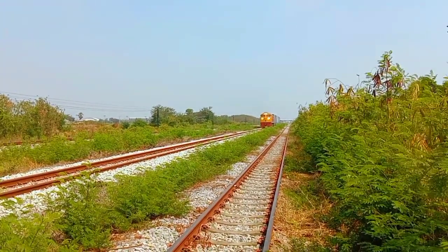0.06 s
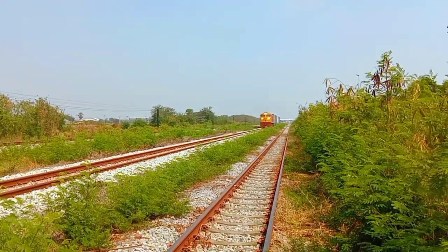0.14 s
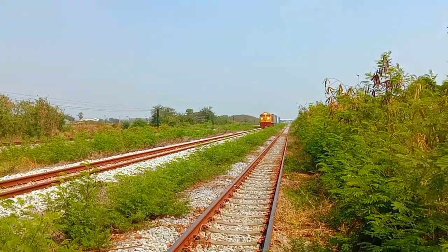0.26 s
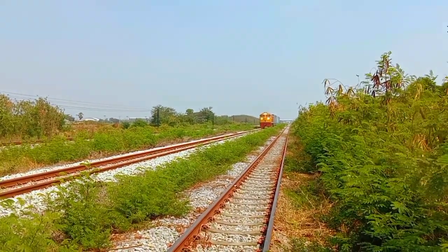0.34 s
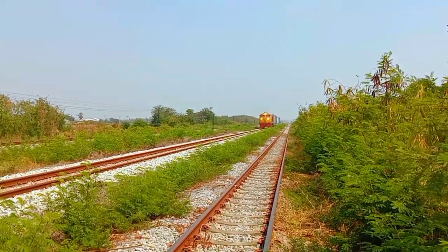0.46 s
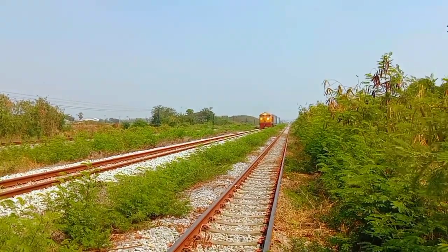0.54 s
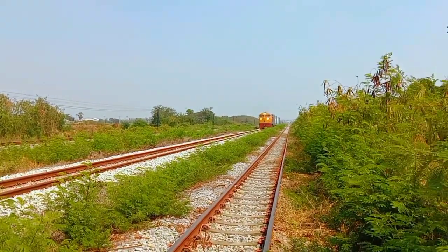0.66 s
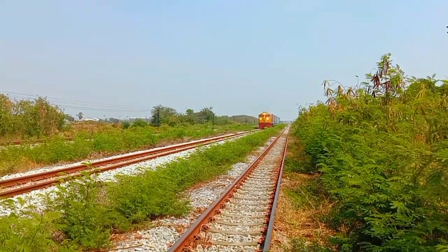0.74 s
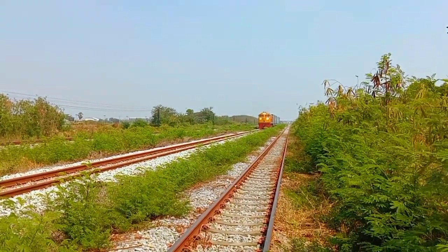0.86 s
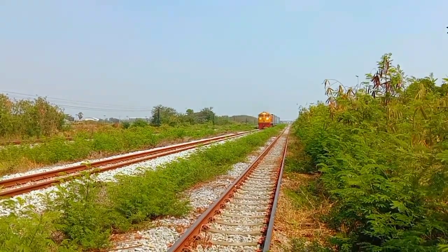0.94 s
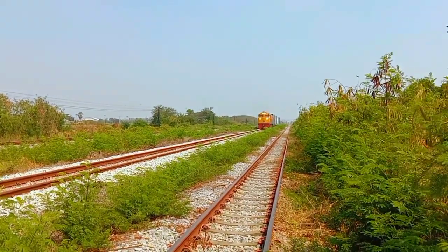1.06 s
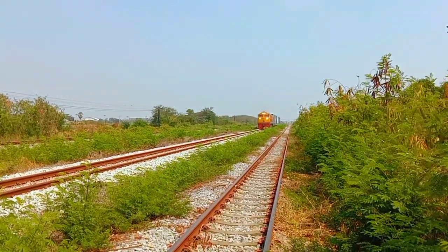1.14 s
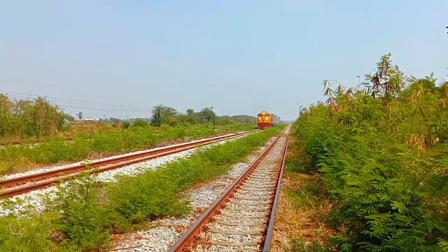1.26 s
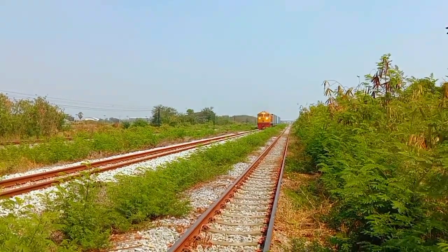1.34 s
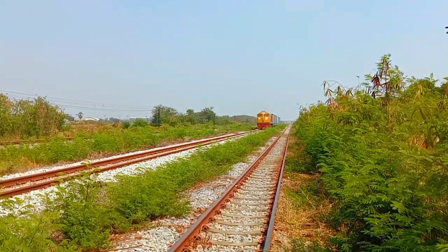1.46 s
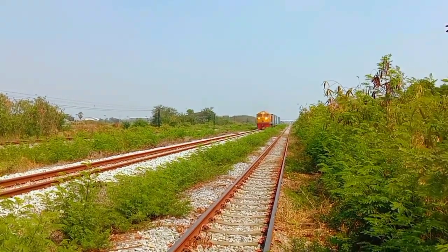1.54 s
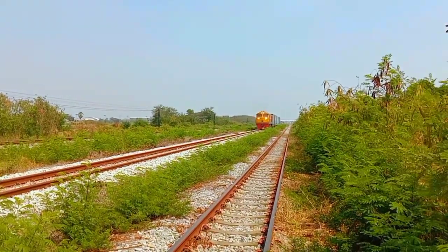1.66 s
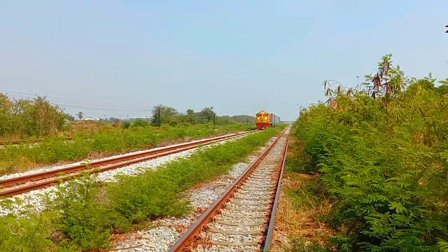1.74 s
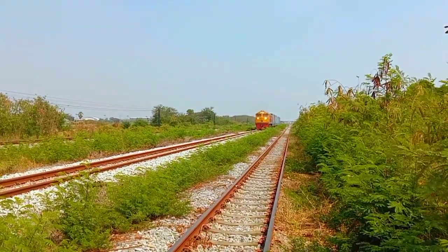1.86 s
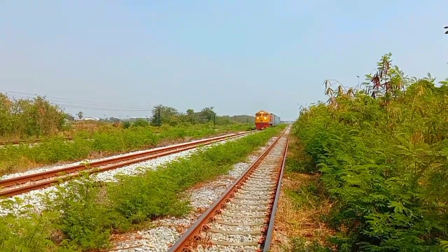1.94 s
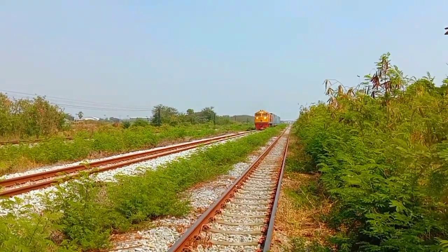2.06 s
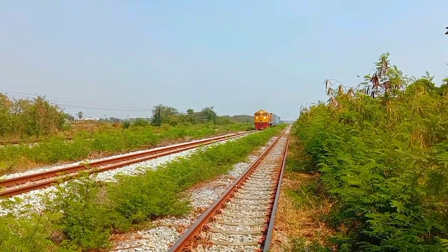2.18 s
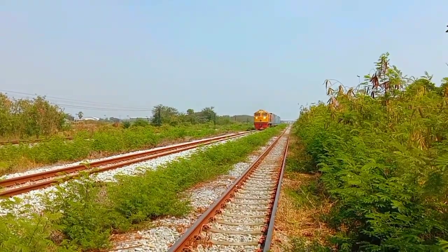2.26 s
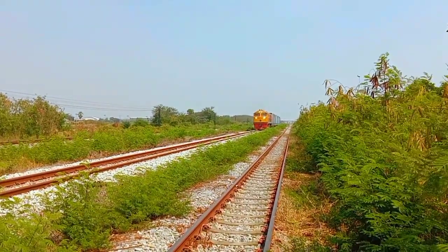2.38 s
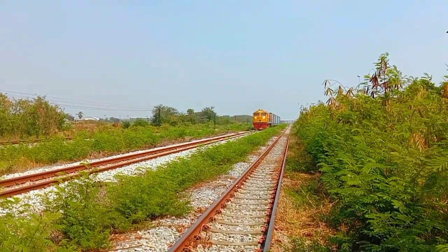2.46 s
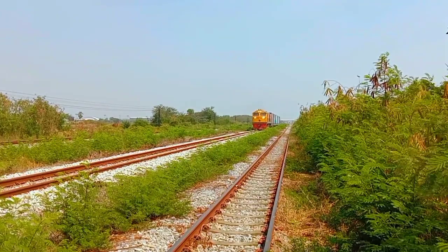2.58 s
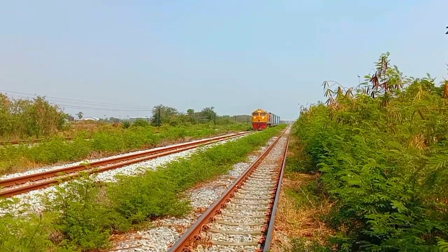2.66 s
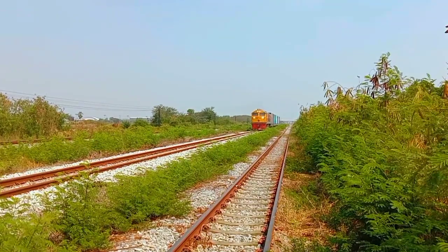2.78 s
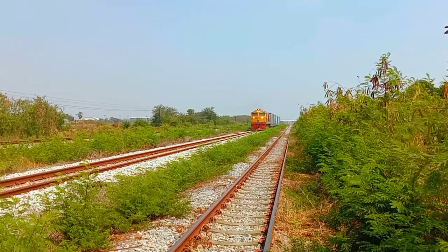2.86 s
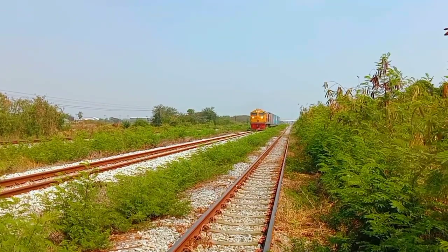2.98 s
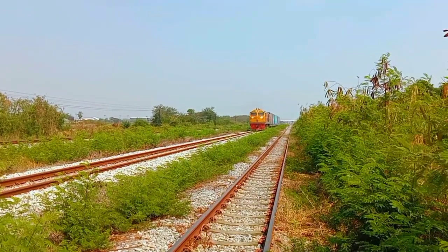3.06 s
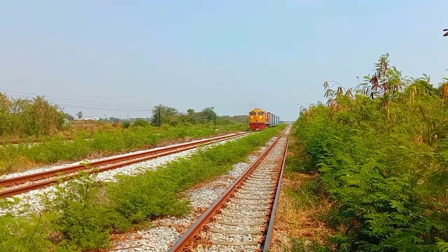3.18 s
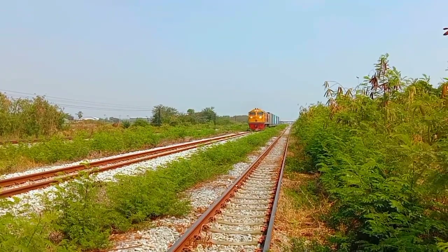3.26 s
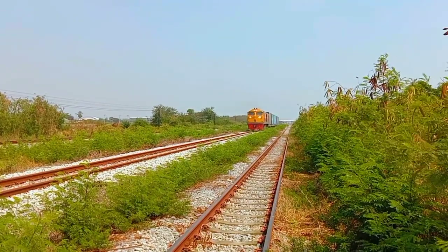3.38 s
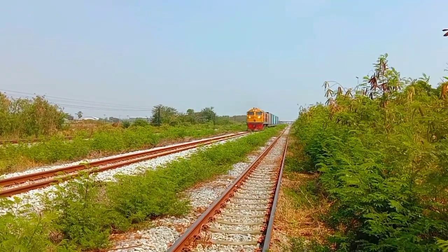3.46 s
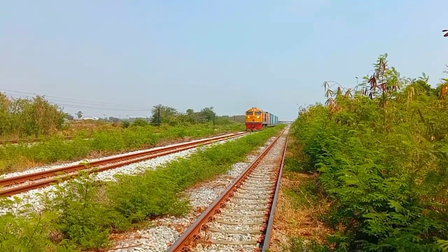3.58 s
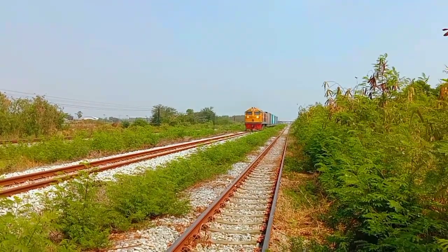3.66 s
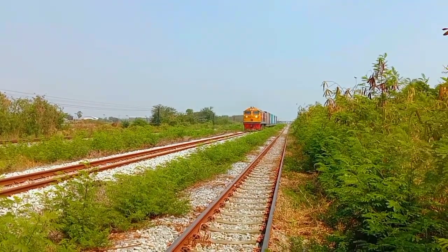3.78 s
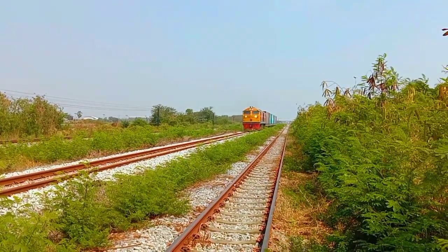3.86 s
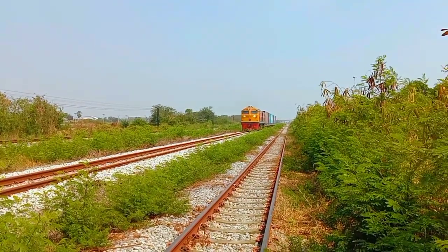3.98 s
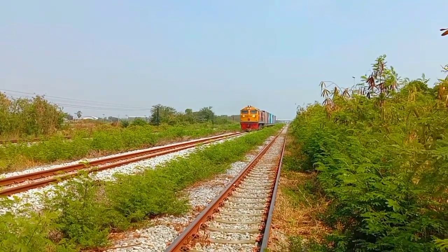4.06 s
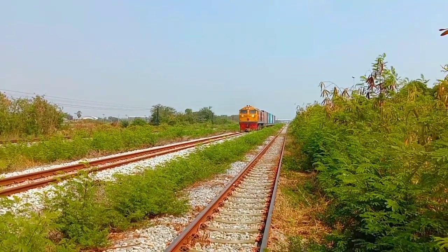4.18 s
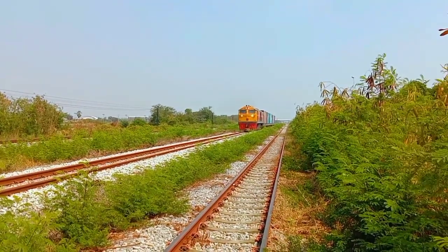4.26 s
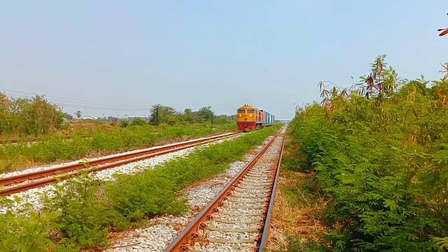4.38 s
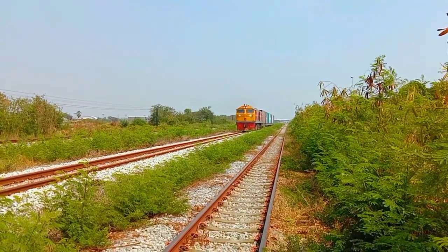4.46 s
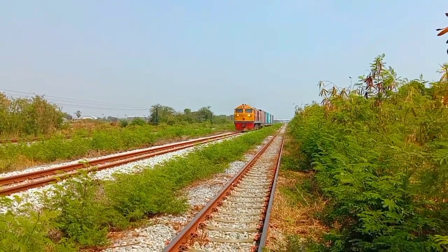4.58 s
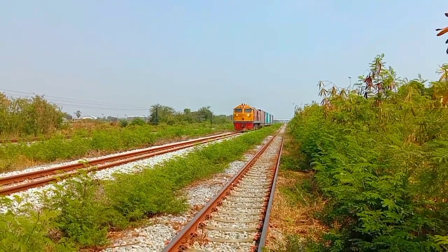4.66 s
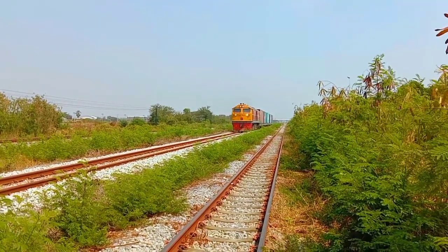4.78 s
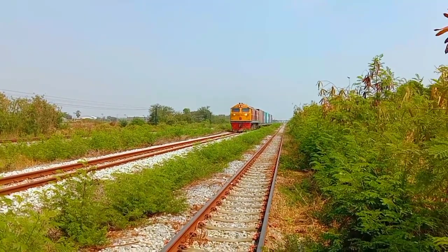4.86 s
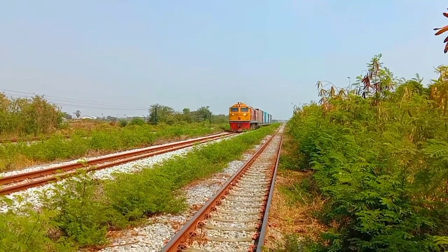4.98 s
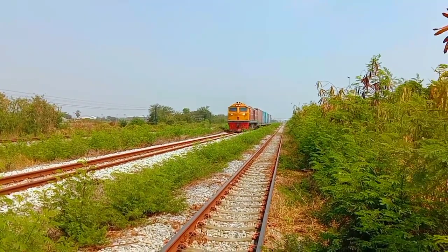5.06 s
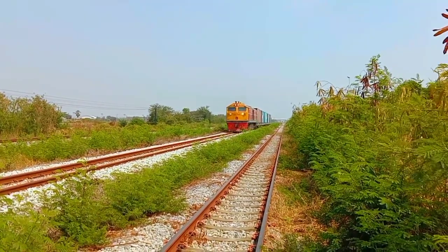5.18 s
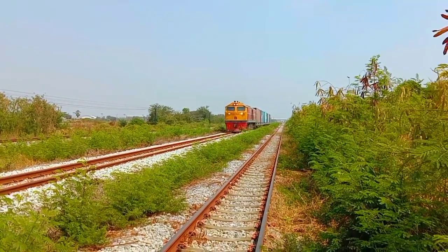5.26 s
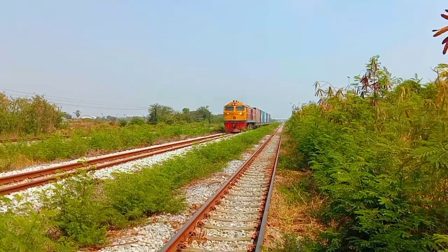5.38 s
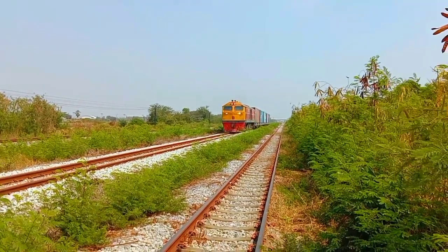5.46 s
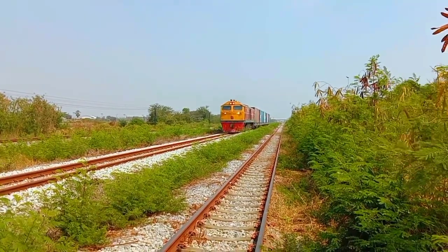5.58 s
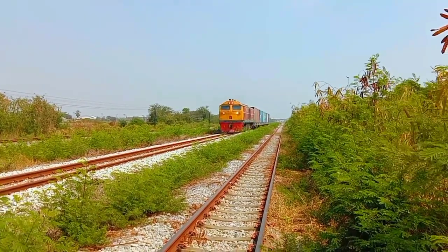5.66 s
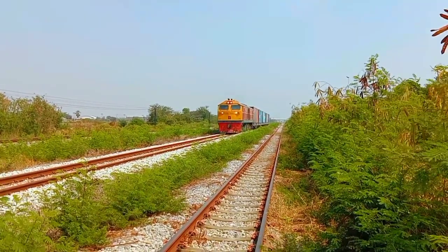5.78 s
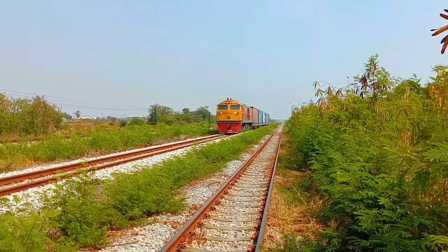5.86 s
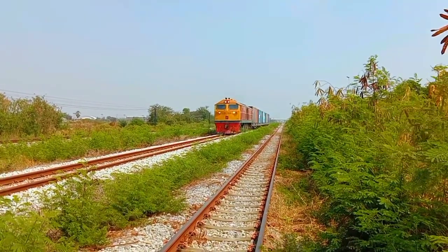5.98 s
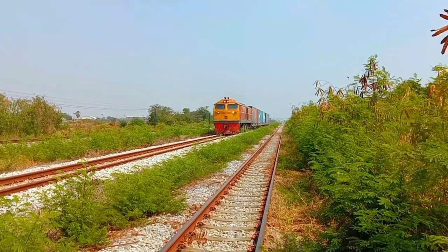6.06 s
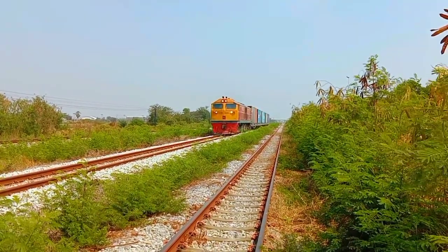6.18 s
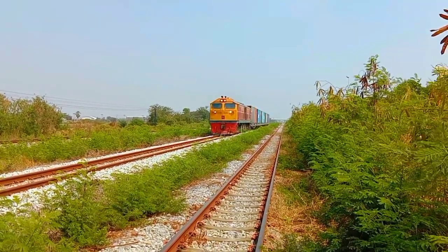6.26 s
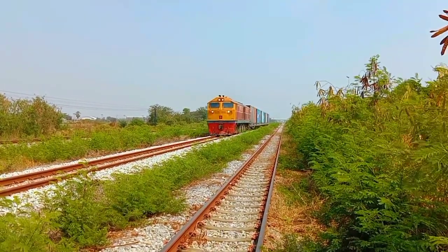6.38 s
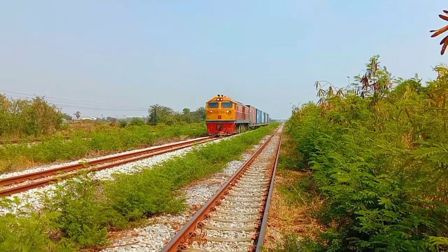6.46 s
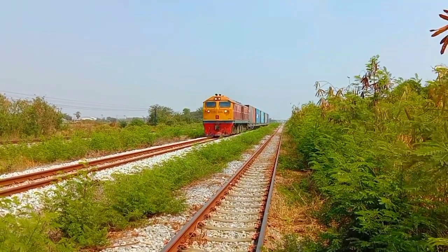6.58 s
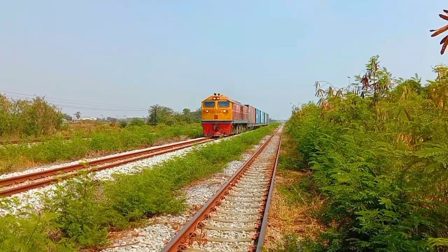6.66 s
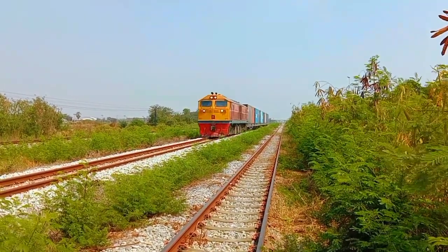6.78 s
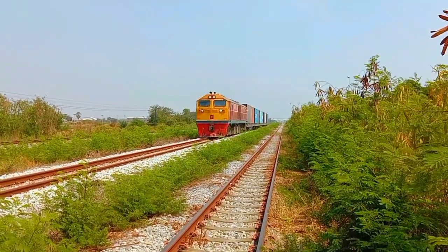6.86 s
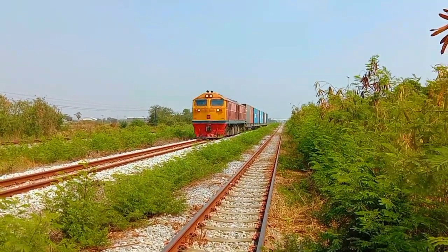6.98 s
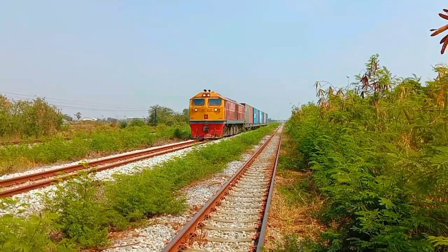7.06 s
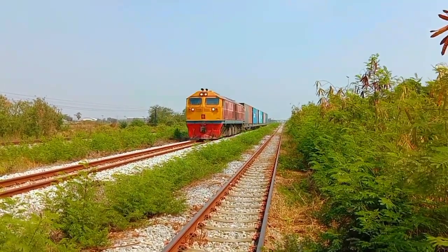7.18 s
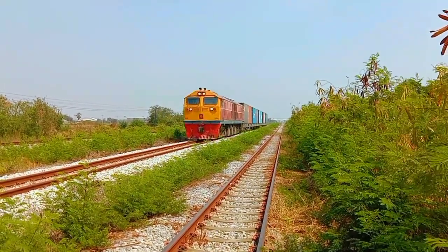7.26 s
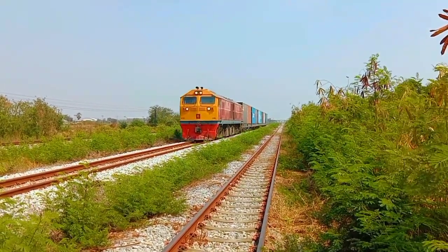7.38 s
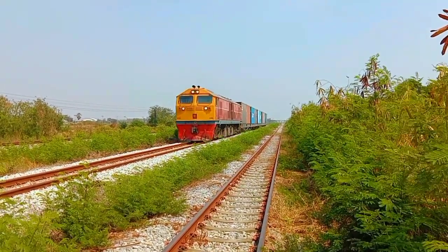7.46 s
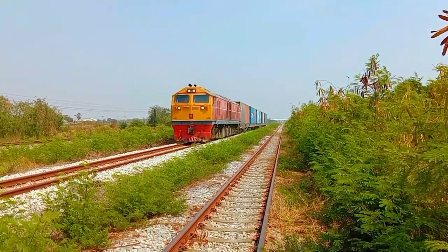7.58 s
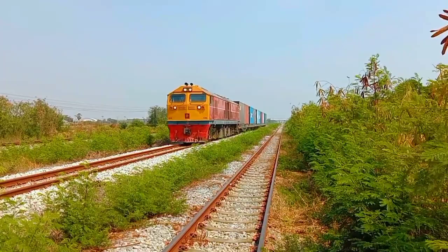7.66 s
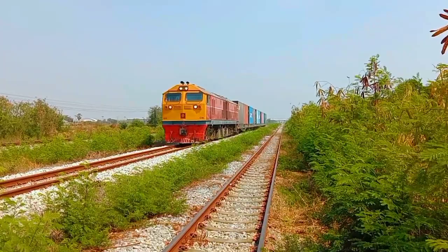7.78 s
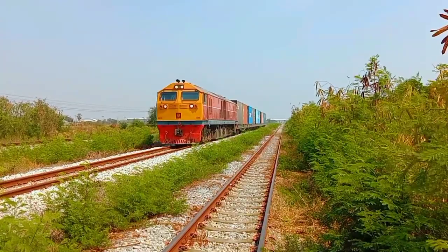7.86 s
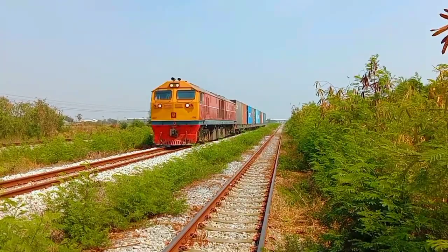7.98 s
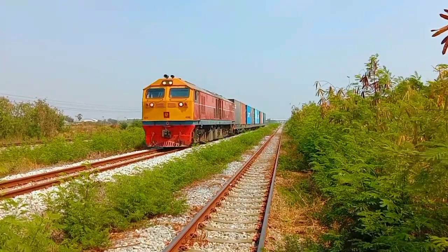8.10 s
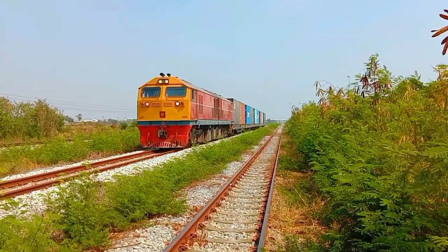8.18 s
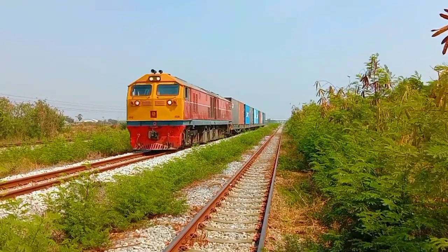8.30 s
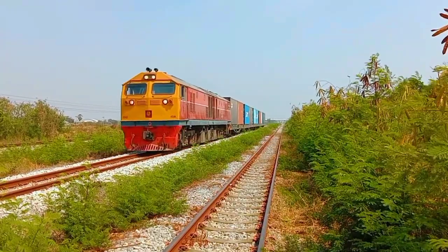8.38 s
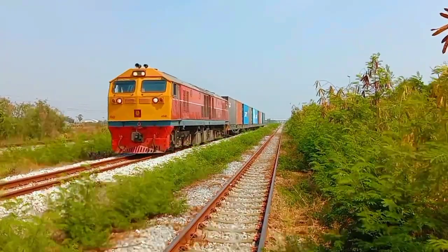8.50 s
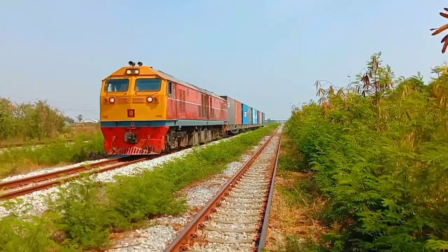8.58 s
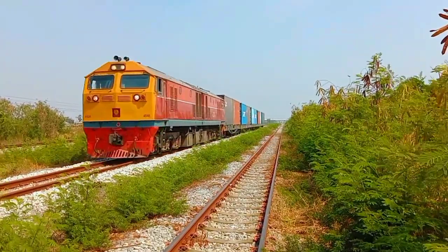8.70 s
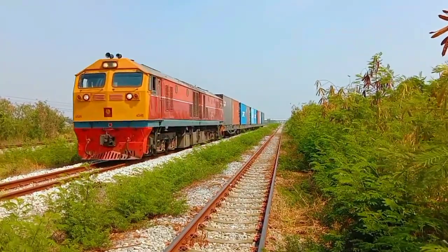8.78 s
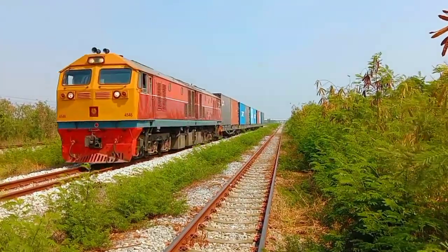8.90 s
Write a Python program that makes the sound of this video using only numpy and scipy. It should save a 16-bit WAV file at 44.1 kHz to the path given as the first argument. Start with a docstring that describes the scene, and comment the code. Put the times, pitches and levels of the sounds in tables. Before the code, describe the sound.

A diesel locomotive's throbbing low hum and broadband roar swell steadily as a freight train approaches outdoors, its engine pitch easing down near the end.

```python
"""A diesel locomotive hums and roars louder as it draws near with freight wagons, then eases its throttle.
The hum is sines on orders of the uneven engine cycle; two gear tones sing beside it on pitches of their own.
Wheels, exhaust and fans are noise in fixed bands that throb with the engine and waver with the moving air.
Over this lie jolt bursts, tone glints and a few dry ticks close by; thin whistles, ragged bursts of hiss
in the highest treble and low wind puffs form the background."""
import sys
import numpy as np
from scipy import signal
from scipy.io import wavfile
from scipy.ndimage import uniform_filter1d

SR = 44100
rng = np.random.default_rng(int(sys.argv[2]) if len(sys.argv) > 2 else 0)


def store_wav(level_fs):
    """Save 16-bit WAV to argv[1]."""
    pcm = np.round(np.clip(np.atleast_2d(level_fs), -1, 1) * 32767)
    wavfile.write(sys.argv[1], SR, pcm.T.astype(np.int16))


N = 393813

# engine speed: (t/s, cycle f/Hz)
CYCLE_HZ = [(0.0, 9.35), (3.5, 9.353), (5.0, 9.371), (5.6, 9.365), (5.75, 9.388), (6.0, 9.48),
            (6.25, 9.485), (6.5, 9.39), (6.75, 9.205), (7.0, 9.1), (7.5, 8.86), (8.25, 8.456), (8.5, 8.362),
            (8.93, 8.24)]
# order spectrum before gain curves and waver: (order of cycle, level/dB)
ORDER_DB = [(5, -57.2), (6, -64.7), (7, -44.3), (8, -41.2), (9, -27.8), (10, -53.5), (11, -27.8),
            (12, -49.8), (13, -33.9), (14, -58.7), (15, -55.3), (16, -49.2), (17, -62.6), (18, -55.3),
            (19, -51.4), (20, -40.2), (21, -43.7), (22, -42.2), (23, -44.4), (24, -37.1), (25, -50.7),
            (26, -50.2), (27, -44.7), (28, -43.4), (29, -41.5), (30, -45.9), (31, -40.2), (32, -34.4),
            (33, -44.4), (34, -42.0), (35, -50.9), (36, -37.0), (37, -42.5), (38, -46.8), (39, -46.7),
            (40, -53.4), (41, -47.6), (42, -53.8), (43, -53.6), (44, -48.1), (45, -37.8), (46, -48.2),
            (47, -45.7), (48, -46.9), (49, -54.4), (50, -48.8), (51, -47.8), (52, -45.8), (53, -55.0),
            (54, -45.0), (55, -55.6), (56, -52.3)]
# uneven exhaust pulses: (place in cycle 0-1, size 0-1)
FIRINGS = [(.06, .25), (.215, .4), (.335, .85), (.425, 1), (.53, .35), (.68, .7), (.79, .4), (.885, .6),
           (.985, .5)]
# leading low orders: (t/s, order 9 level/dB, order 11 level/dB)
HUM_DB = [(0, -52, -45.5), (.5, -52, -62), (1, -56, -62), (1.5, -50, -62), (2, -38.5, -48),
          (2.5, -35.5, -32.5), (3.5, -29.5, -26), (4, -26.5, -28.5), (5, -23.5, -25), (5.5, -23.5, -28),
          (6.25, -23, -34), (6.55, -24.5, -37), (7, -23, -25), (7.3, -25.5, -32.5), (7.5, -28.5, -35),
          (7.8, -27.5, -36), (8.3, -27, -24.5), (8.93, -42, -31.5)]
# gain of orders from 19 up that do not bloom: (t/s, gain/dB)
UPPER_DB = [(0, -15), (1, -16), (1.5, -5), (2.5, -6), (3.5, -5), (5.6, 0.5), (6.5, -5.5), (7.3, -7),
            (8, -0.5), (8.5, 0.5), (8.93, 10.5)]
ORDER13_UNDER_11_DB = 6.5
ORDER7_PER_ORDER9 = .72  # dB per dB
LAG_PER_ORDER9 = .5  # dB per dB; orders 19-23 sink while order 9 is under its table level


def engine(turns, waver_db=2.5):
    """Exhaust pulses repeat each cycle, so the hum is sines at multiples of the cycle rate."""
    base_db = dict(ORDER_DB)
    ninth, eleventh = curves(HUM_DB)
    upper_db, = curves(UPPER_DB)
    lead = {9: ninth, 11: eleventh, 13: eleventh - ORDER13_UNDER_11_DB}
    lead[7] = base_db[7] + ORDER7_PER_ORDER9 * (ninth - ninth.max())
    for order in (20, 24, 27, 29, 32, 45, 54):
        lead[order] = blooms(str(order))
    lag_db = LAG_PER_ORDER9 * np.minimum(ninth - base_db[9], 0)
    place, size = np.transpose(FIRINGS)
    out = np.zeros(N)
    for order, db in ORDER_DB:
        if order < 19:
            # the pipe delays low orders unevenly: each throb swells slowly and stops short
            start = .2 * order - .025 * (order - 9) ** 2
            follow_db = lead[7] - base_db[7]
        else:
            # high orders line up so that each pulse is a sharp dip in pressure
            pulses = size @ np.exp(-2j * np.pi * order * place)
            start = np.angle(pulses) / (2 * np.pi) - .25
            follow_db = upper_db + lag_db * (order < 24)
        if order in lead:
            level_db = lead[order]
        else:
            level_db = db + follow_db + waver_db * walk(1.48)  # moving air
        out += undb(level_db) * np.sin(2 * np.pi * (order * turns + start))
    return np.sqrt(2) * out


# floor between blooms: {tone: level/dB}
RESTING_DB = {"20": -57, "24": -54, "27": -52.5, "29": -54, "32": -47, "45": -50, "54": -57, "low gear":
              -50.5}
# (tone: engine order or gear, t/s, half length/s, peak level/dB over the floor's gain)
BLOOMS = [("20", 3.9, .8, -42), ("20", 5.57, .7, -36), ("20", 7.6, .8, -43), ("27", 2.1, .5, -41),
          ("27", 6.1, 0.49, -33), ("27", 7.4, .5, -33.5), ("27", 8.4, 0.43, -32), ("24", 1.58, 0.32, -36.5),
          ("24", 3.68, 0.34, -37.5), ("24", 4.28, 0.47, -36.5), ("24", 6.0, 0.23, -33.5),
          ("24", 6.87, 0.25, -31.5), ("24", 7.6, 0.51, -37.5), ("29", 2.18, 0.42, -35),
          ("29", 5.2, 0.18, -32), ("29", 5.78, 0.38, -28), ("29", 6.37, .22, -25), ("29", 7.34, 0.4, -28.5),
          ("29", 7.8, 0.21, -31.5), ("29", 6.9, 0.12, -35), ("32", 2.5, 0.26, -32), ("32", 1.15, 0.13, -44),
          ("32", 4.06, 0.9, -39), ("32", 5.5, 0.54, -27.5), ("32", 7.58, 0.44, -37),
          ("32", 8.64, 0.68, -30.5), ("45", 1.4, 0.83, -44), ("45", 3.46, 0.88, -39.5),
          ("45", 5.08, .8, -38), ("45", 8.7, 0.32, -33), ("54", 1.78, 0.51, -44), ("54", 3.7, 0.87, -43),
          ("54", 5.64, 0.43, -41), ("54", 8.66, 0.4, -43), ("low gear", 2.0, .3, -38.5),
          ("low gear", 6.05, 0.27, -33), ("low gear", 7.4, 0.44, -33.5), ("low gear", 8.9, 0.53, -27)]


def blooms(tone):
    """Level/dB of a tone: steady floor gain plus bell-shaped swells."""
    rows = [row[1:] for row in BLOOMS if row[0] == tone]
    return 20 * np.log10(undb(RESTING_DB[tone]) + bells(rows))


# (t/s, low gear f/Hz, high gear f/Hz)
GEAR_HZ = [(0, 281, 337), (3, 286, 345), (5, 290, 350), (6.5, 291, 352), (8.93, 289, 351)]
# (t/s, high gear level/dB)
HIGH_GEAR_DB = [(0, -43.5), (2.5, -38), (5, -32.5), (6.5, -34.5), (7.5, -40), (8.2, -34), (8.93, -32)]


def gears():
    """Two meshing tones, free of the engine cycle; the low one blooms, the high one follows a curve."""
    low_hz, high_hz = curves(GEAR_HZ)
    high_db, = curves(HIGH_GEAR_DB)
    return gear(low_hz, blooms("low gear")) + gear(high_hz, high_db)


def gear(hz, db, waver_db=2.0, drift_hz=1.5):
    """One sine whose pitch drifts and whose level wavers at random."""
    level = undb(db + waver_db * walk(6))
    phase = np.cumsum(hz + drift_hz * walk(4)) / SR
    return np.sqrt(2) * level * np.sin(2 * np.pi * phase)


# noise bands of each layer: (centre f/Hz, width/Hz, relative level/dB)
RUMBLE = [(40, 44, -22), (91.3, 53, 2.5), (145, 95, -1.5), (206, 54.3, 2.5)]
DRONE = [(238.8, 35, -14), (291.4, 76, -8), (351, 94, -13), (440.8, 76, -13), (518.3, 75, -23)]
GROWL = [(599, 50, -16), (698, 83, -9), (782, 96, -3.5)]
CLATTER = [(899, 124, -11.5), (999, 160, -3.5), (1107, 134, -9.5), (1268, 140, -13.5)]
WHEELS = [(1406, 129, -5), (1543.4, 149, -5), (1679, 142, -9.5)]
RUSH = [(2590, 210, -10.5), (2750, 260, -5.5), (3030, 294, -8)]
RING = [(3342, 220, -10), (3450, 213, -4), (3766, 240, -9)]
HISS = [(5060, 160, -13.5), (5250, 310, -12.5), (5684, 610, -5.5), (5924, 250, -11.5)]
SIZZLE = [(6500, 470, -6.5), (6870, 600, -6), (7200, 500, -11), (7710, 420, -19.5), (8140, 860, -28.5)]
AIR = [(9300, 1200, -17.5), (10360, 710, -7), (11060, 870, -9.5), (12500, 2000, -14)]
TOP = [(13800, 700, -2.5), (14600, 1000, -5.5), (15200, 500, -6)]
# hollows between the bands, which fill in as the train comes close; same columns
GAPS = [(1908, 190, -3), (2201, 240, -1), (2328, 280, -5), (3900, 130, -13.5), (4210, 850, -9.5),
        (4635, 740, -2)]
# layer mix: (bands, level/dB at CLOSE_M, dB per dB of nearness, share of swell, share of lean,
# throb/dB, flicker/dB)
LAYERS = [(RUMBLE, -26.5, 1.38, 0.42, 1.22, 0.38, .2), (DRONE, -16.5, 0.85, 0.28, 0.67, 0.27, 2.42),
          (GROWL, -30.5, 1.17, 1.5, 1.62, 0.47, 3.8), (CLATTER, -31, 0.93, 1.54, 0.87, 0.35, 2.75),
          (WHEELS, -27, 1.066, 0.65, -0.24, 0.32, 1.66), (RUSH, -31.5, 1.477, 0.96, -1.2, .28, 2.3),
          (RING, -37, 1.37, 0.88, -0.5, 0.35, 0.44), (HISS, -33.5, 1.83, 1.26, -0.36, 0.44, 3.04),
          (SIZZLE, -34, 1.54, 0.58, 0.4, 0.39, 0.65), (AIR, -54.5, 1.69, .1, -.9, .44, 2.2),
          (TOP, -67.5, 1.0, .1, -.3, .3, 3), (GAPS, -37, 2.15, 1.1, -0.27, 0.52, 1.7)]
# air carries the roar better or worse: (t/s, swell/dB)
SWELL_DB = [(0, -4), (.45, -6), (.8, -3), (.92, 1), (1.25, 3), (1.36, 6), (1.55, 6.5), (1.9, 0), (2.3, -5),
            (2.62, -5), (2.8, 0), (3.3, 0.5), (3.7, 3.5), (4.3, -0.5), (5.0, -.5), (5.6, 2.5), (6.1, 0),
            (6.7, 0.5), (7.2, -1), (7.58, -0.5), (7.72, 1), (8.93, 1)]
# tilt of the roar toward the bass: (t/s, lean/dB)
LEAN_DB = [(0, -3), (.8, -4), (1.5, -1.5), (2.5, 2.5), (4.5, 2.5), (5.7, 2), (6.3, 1.5), (7.5, -1),
           (8.2, -1.5), (8.93, -0.5)]
CHATTER_DB, CHATTER_PER_S = .7, 45.


def train_roar(turns, near_db):
    """Layers of band noise grow with nearness and throb as some cylinders bark louder."""
    (swell_db,), (lean_db,) = curves(SWELL_DB), curves(LEAN_DB)
    # swells 1, 2, 3, 4 and 8 times a cycle
    beat = sum(np.cos(2 * np.pi * k * turns + k) for k in (1, 2, 3, 4, 8))
    # loose parts of engine and wheels chatter through every band at once
    chatter_db = CHATTER_DB * walk(CHATTER_PER_S)
    out = np.zeros(N)
    for bands, db, closing, swells, leans, throb_db, flicker_db in LAYERS:
        level_db = db + closing * near_db + swells * swell_db + leans * lean_db
        throb = undb(throb_db * beat + chatter_db)
        out += roar(bands, level_db, throb, flicker_db)
    return out


def roar(bands, db, gain, flicker_db):
    """Noise in fixed bands; each flickers on its own, all share one level and gain."""
    out = np.zeros(N)
    for hz, width, band_db in bands:
        noise = band(rng.standard_normal(N), hz, width, order=3) * np.sqrt(SR / 2 / width)
        out += noise * undb(band_db + flicker_db * walk(14))
    return out * undb(db) * gain


SPEED_M_S, CLOSE_M, ARRIVES_S = 17., 30., 10.55


def nearness():
    """Spherical spreading gain/dB of a source closing in at steady speed, 0 at CLOSE_M."""
    distance_m = SPEED_M_S * (ARRIVES_S - np.arange(N) / SR)
    return -20 * np.log10(distance_m / CLOSE_M)


# fading scale before frequency weighting: (t/s, depth/dB)
EDDY_DB = [(0, 6.5), (4, 6.5), (7.3, 5), (7.8, 2), (8.93, 2)]
# drifting treble hollow: (t/s, centre f/Hz, gain/dB)
HOLLOW = [(0, 4560, -6), (1.2, 4930, -4), (3.0, 4630, -5), (4.6, 4570, -9), (5.5, 4100, -2.5),
          (6.3, 4050, -12.5), (7.6, 3500, -6), (8.0, 3900, 1), (8.93, 4200, -6)]
# wide patches that fade or stand out: (t/s, half length/s, centre f/Hz, half width/Hz, gain/dB)
PATCHES = [(1.5, 0.13, 3200, 300, -3), (0.7, .3, 4300, 770, 1.5), (1.5, 0.051, 1000, 300, -4),
           (3, 0.16, 3250, 380, -5), (4.5, 0.11, 840, 57, -9), (3.0, 0.054, 1670, 240, -11),
           (4.5, 0.18, 1570, 250, -8), (5, 1, 3410, 500, 9.5), (8, 0.83, 3920, 220, -3),
           (6, 1.1, 1184, 146, -18.5), (4.5, 0.32, 1950, 350, -4), (6.4, .4, 11000, 2700, -8),
           (2, 0.32, 920, 900, 3), (1, 0.24, 6600, 1200, 5), (7.0, 0.6, 542, 80, -8.5),
           (0, 0.33, 215, 55, -17), (4, 0.64, 6500, 920, -6), (-0.5, 0.34, 3350, 140, 12),
           (0, 0.43, 3800, 180, -13), (2.5, 0.11, 3450, 120, 6.5), (1, .25, 3520, 200, 1.5),
           (.15, .25, 3100, 400, 3), (5.5, .5, 720, 110, -3.5), (4, .5, 10000, 500, -2),
           (1.6, 0.28, 1230, 140, 7), (1.3, .4, 104, 38, -6), (7, 0.17, 5200, 760, 1),
           (2.5, .3, 3900, 300, -5), (2.5, .04, 1450, 330, 4), (1, .05, 2400, 330, 4),
           (2.5, 0.23, 470, 69, -3.5), (2, .35, 5000, 700, -7.5), (1.5, 2.2, 3140, 140, -8),
           (2.5, 0.12, 2900, 200, 6), (0.5, .12, 1900, 200, 4), (2, .22, 1100, 330, 0.5),
           (3.5, 0.19, 1400, 300, 4), (0, 0.21, 690, 120, 1), (2, .15, 2650, 140, 1),
           (0.5, 0.076, 2740, 130, 5), (0.5, 0.37, 1720, 160, 5), (2, 0.39, 1290, 130, -11.5),
           (1.9, 0.37, 1550, 250, 2.5), (1, .3, 92, 35, 3.5), (1, .1, 1300, 320, 1),
           (5.5, 0.22, 1900, 200, -2), (4, 0.37, 3270, 240, -11.5), (2.5, 0.32, 1050, 130, 8),
           (0, 0.27, 1300, 150, -6), (0.5, 0.087, 1400, 200, 4), (5.5, 0.17, 950, 150, -3),
           (3, 0.17, 3860, 290, 9), (0.6, 0.16, 4250, 550, 4), (1, 0.16, 4500, 390, 6),
           (7, 0.61, 3180, 120, 7.5), (5.5, .2, 4100, 200, -6), (6.5, 0.14, 4600, 480, 0),
           (3.5, .35, 4050, 320, 6), (3.5, .6, 2710, 290, 3), (6, 0.24, 3900, 2300, 2.5),
           (0.5, 0.43, 5040, 500, 1), (3, 0.27, 5700, 1500, -5), (3.5, 1, 13000, 900, 6.5),
           (3.5, 1.2, 8500, 940, -8.5), (7, 1, 13000, 1500, -7), (8.07, 0.3, 1600, 94, -3.5),
           (6.5, .35, 1700, 500, 0), (3.5, 0.45, 3500, 300, -3), (4, 0.45, 140, 43, -10.5),
           (3, 0.28, 2900, 230, 4), (0.5, 0.4, 1200, 150, 0.5), (8.75, .35, 9000, 900, 4),
           (8.5, 0.84, 760, 150, -1.5), (0.5, .5, 5350, 250, 4.5), (11, .5, 12400, 800, 1),
           (-0.2, 0.28, 2230, 190, -10), (6, 0.34, 970, 170, -1.5), (4, 0.33, 1740, 270, -7.5),
           (8.5, 0.85, 3600, 680, 1.5), (2.5, 0.53, 8700, 1700, -3), (4, 1, 6850, 500, 8)]
HOLLOW_HALF_HZ, CALM_HZ = 350, 13000
CREST = 2.2  # soft limit of the random fading, in spreads


def eddies(x, patch_hz=70., patch_s=.05, knee_hz=1160.0):
    """Warm eddies on the path fade narrow patches, most near 4-5 kHz, less as the path shortens."""
    f, t, spec = signal.stft(x, SR, nperseg=1024)
    field = rng.standard_normal(spec.shape)
    for _ in range(2):
        field = uniform_filter1d(field, int(patch_hz / f[1]) + 1, axis=0)
        field = uniform_filter1d(field, int(patch_s / t[1]) + 1, axis=1)
    weight = f / (f + knee_hz) / (1 + (f / CALM_HZ) ** 2)
    depth_db = np.outer(weight, np.interp(t, *np.transpose(EDDY_DB)))
    fade_db = depth_db * CREST * np.tanh(field / field.std() / CREST)
    s, hz, db = np.transpose(HOLLOW)
    offset_hz = f[:, None] - np.interp(t, s, hz)
    fade_db += np.interp(t, s, db) * np.exp(-(offset_hz / HOLLOW_HALF_HZ) ** 2)
    for s, half_s, hz, half_hz, db in PATCHES:
        across_f = np.exp(-((f - hz) / half_hz) ** 2)
        across_t = np.exp(-((t - s) / half_s) ** 2)
        fade_db += db * np.outer(across_f, across_t)
    return signal.istft(spec * undb(fade_db), SR, nperseg=1024)[1][:N]


# (t/s, half length/s, level/dB before band levels)
JOLTS = [(7.72, .02, -69), (7.97, .012, -63), (8.027, .008, -64), (8.14, .02, -64), (8.29, .015, -66),
         (8.44, .028, -58), (8.6, .012, -62), (8.74, .02, -60), (8.8, .01, -61)]
# (centre f/Hz, width/Hz, relative level/dB)
JOLT_BANDS = [(9000, 1700, 3), (10800, 2000, -4), (12500, 1600, -6), (14300, 2000, -3)]


def jolts():
    """Wheels jolt and spit grit: brief noise bursts across the high treble."""
    return bursts(JOLTS, JOLT_BANDS, flicker_db=2.5)


def bursts(table, bands, flicker_db):
    """Bell-shaped bursts of noise bands, ragged within."""
    return roar(bands, flicker_db * walk(45), bells(table), 1.2)


# (low f/Hz, high f/Hz, count, level/dB at CLOSE_M, dB per dB of nearness, half length/s)
GLINTS = [(10050, 11500, 500, -59, 1.16, .008), (8500, 10600, 800, -55, 2.5, .008),
          (2594, 2850, 70, -42, 0.9, .022), (3300, 3550, 50, -44.5, 0.5, .022),
          (5270, 6100, 90, -46.5, 1.6, .018)]
GLINT_SPREAD_DB = 3.


def glints(near_db):
    """Brief sine grains at random moments, pitches and sizes, louder with nearness."""
    out = np.zeros(2 * N)
    for low_hz, high_hz, count, db, closing, half_s in GLINTS:
        t = np.arange(-2 * half_s, 2 * half_s, 1 / SR)
        for when, pitch, size in rng.random((int(count), 3)):
            i = int(when * N)
            level_db = db + closing * near_db[i] + GLINT_SPREAD_DB * (2 * size - 1)
            tone = np.sin(2 * np.pi * (low_hz + (high_hz - low_hz) * pitch) * t)
            out[i:i + len(t)] += undb(level_db) * np.exp(-(t / half_s) ** 2) * tone
    return out[:N]


# (t/s, peak level/dB, centre f/Hz, width/Hz, t60/s)
TICKS = [(1.0437, -30, 2900, 3200, .002), (1.03, -40, 2700, 1200, .08), (1.045, -39, 2900, 1800, .12),
         (1.0685, -32, 2800, 1600, .012), (1.0748, -24, 3000, 1800, .003), (1.075, -36, 3000, 1800, .06),
         (3.2535, -36, 6200, 2600, .002), (3.2535, -58, 10500, 4000, .002), (3.2712, -32, 5100, 1100, .003),
         (3.2712, -21, 7200, 3000, .0025), (3.273, -41, 6200, 2800, .1), (3.2712, -32, 11800, 2200, .002),
         (3.2712, -38, 14500, 3000, .002), (3.273, -57, 12500, 4000, .05)]
SNAP_T60_S = .005  # up to this a tick is a single one-sided snap


def ticks():
    """Decaying noise through a band-pass, as of dry stems or a hand close to the phone."""
    length = 2048
    out, t = np.zeros(N + length), np.arange(length) / SR
    for s, db, hz, width, t60 in TICKS:
        push = rng.standard_normal(length)
        if t60 <= SNAP_T60_S:
            push = abs(push)
        envelope = 1000. ** (-t / t60) * np.tanh(20 * t / t60)
        click = band(push * envelope, hz, width, order=4)
        i = int(s * SR)
        out[i:i + length] += undb(db) * click / abs(click).max()
    return out[:N]


# (t/s, length/s, start f/Hz, end f/Hz, level/dB)
WHISTLES = [(.05, .085, 5680, 5620, -67), (.20, .075, 3800, 3760, -60)]


def whistles():
    """Thin sine glides, perhaps far birds, that fade in and out."""
    out = np.zeros(N)
    for s, length_s, start_hz, end_hz, db in WHISTLES:
        u = np.arange(int(length_s * SR)) / (length_s * SR)
        hz = start_hz + (end_hz - start_hz) * u
        tone = np.sin(2 * np.pi * np.cumsum(hz) / SR)
        i = int(s * SR)
        out[i:i + len(u)] += np.sqrt(2) * undb(db) * np.sin(np.pi * u) ** .5 * tone
    return out


# (t/s, half length/s, level/dB before band levels)
FLUTTERS = [(.3, .1, -79), (1.0, .15, -78), (1.25, .03, -77), (1.6, .06, -76), (1.9, 0.065, -76),
            (2.83, .05, -72), (3.23, .025, -70), (3.28, .012, -66), (3.335, .03, -64), (4.1, 0.034, -73),
            (5.52, .07, -72), (5.8, .06, -75), (6.3, 0.056, -73), (7.09, 0.035, -67), (7.95, .04, -69),
            (8.03, .015, -64), (8.095, .015, -62), (8.24, .02, -63), (8.385, .01, -62), (8.55, .02, -57),
            (8.655, .025, -59), (8.74, .025, -60), (8.805, .015, -62), (8.885, .025, -58)]


def flutters():
    """Ragged bursts of hiss in the highest treble: noise bands under bell-shaped gains."""
    return bursts(FLUTTERS, TOP, flicker_db=4.5)


def breeze(db=-50, puff_db=3.5, hz=71.5, width=24.0):
    """Wind on the microphone: low band noise in random puffs."""
    noise = band(rng.standard_normal(N), hz, width, order=2) * np.sqrt(SR / 2 / width)
    return undb(db + puff_db * walk(6)) * noise


def undb(db):
    """Decibels to gain."""
    return 10 ** (np.asarray(db) / 20)


def curves(table):
    """Columns of a table, interpolated over every sample."""
    s, *columns = np.transpose(table)
    return [np.interp(np.arange(N) / SR, s, c) for c in columns]


def walk(rate):
    """Random levels held about 1 / rate s and smoothed twice; spread near 1."""
    step = 64
    hold, n = int(SR / step / rate) + 1, N // step + 2
    slow = np.repeat(rng.standard_normal(n // hold + 1), hold)
    slow = uniform_filter1d(uniform_filter1d(slow, hold), hold)[:n]
    return 1.3 * np.interp(np.arange(N) / step, np.arange(n), slow)


def band(x, hz, width, order=2):
    """Butterworth band-pass."""
    edges = [max(hz - width / 2, 10), min(hz + width / 2, .45 * SR)]
    return signal.sosfilt(signal.butter(order, edges, "bandpass", fs=SR, output="sos"), x)


def bells(rows):
    """Sum of Gaussian gains from rows of (t/s, half length/s, level/dB)."""
    t = np.arange(0, N / SR + .002, .002)
    gain = sum(undb(db) * np.exp(-((t - s) / half_s) ** 2) for s, half_s, db in rows)
    return np.interp(np.arange(N) / SR, t, gain)


def scene():
    """Engine, gears and roar of the train, then the small sounds and the wind."""
    near_db = nearness()
    turns = np.cumsum(curves(CYCLE_HZ)[0]) / SR
    train = engine(turns) + gears() + eddies(train_roar(turns, near_db))
    details = jolts() + glints(near_db) + ticks()
    background = whistles() + flutters() + breeze()
    return (train + details + background)[None]


TOP_HZ = 15500


def record(dry):
    """The phone cuts the top: a steep elliptic low-pass."""
    return signal.sosfilt(signal.ellip(12, .2, 80, TOP_HZ, fs=SR, output="sos"), dry)


dry = scene()
out = record(dry)
store_wav(out)
```